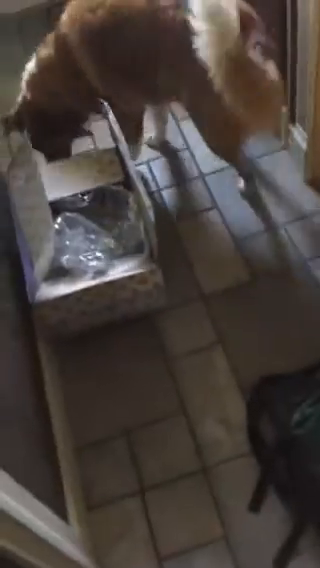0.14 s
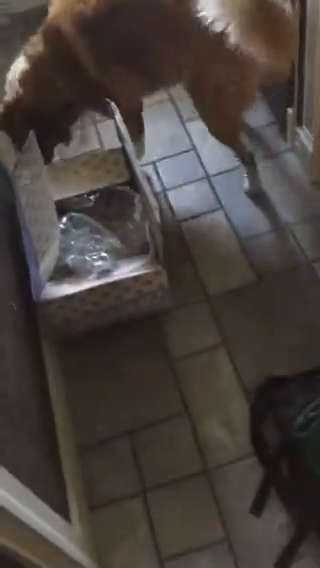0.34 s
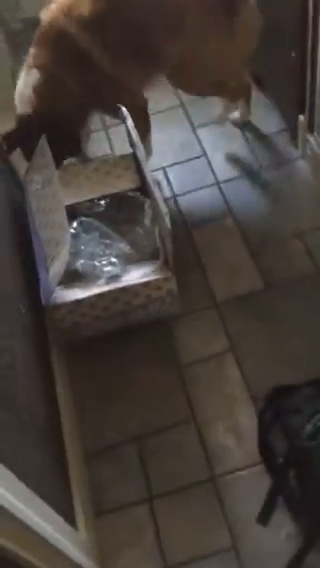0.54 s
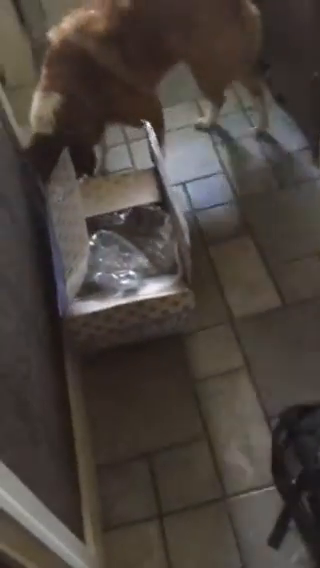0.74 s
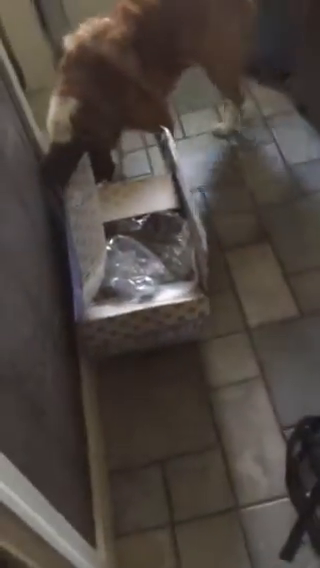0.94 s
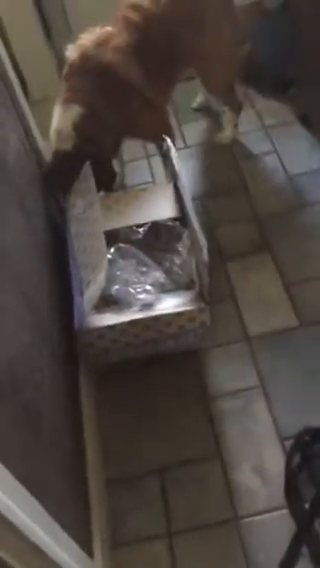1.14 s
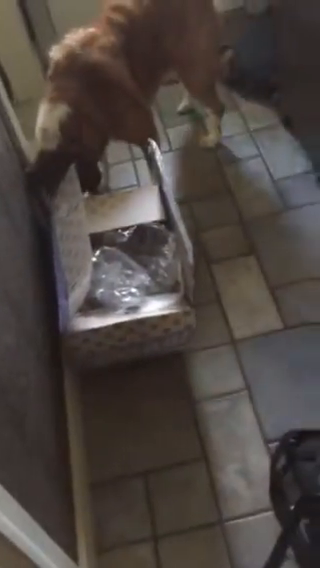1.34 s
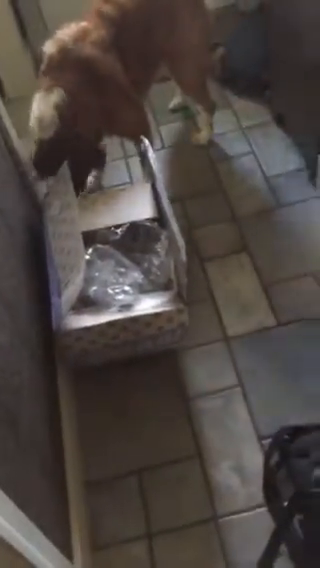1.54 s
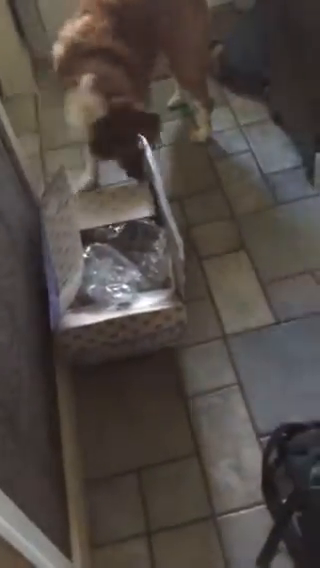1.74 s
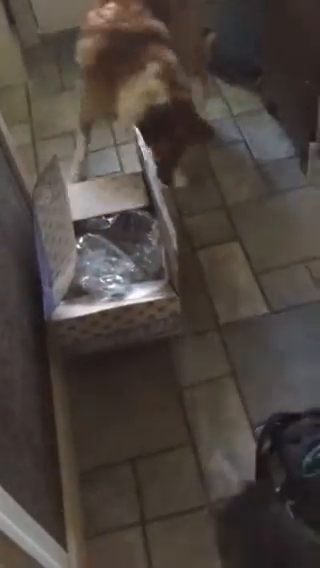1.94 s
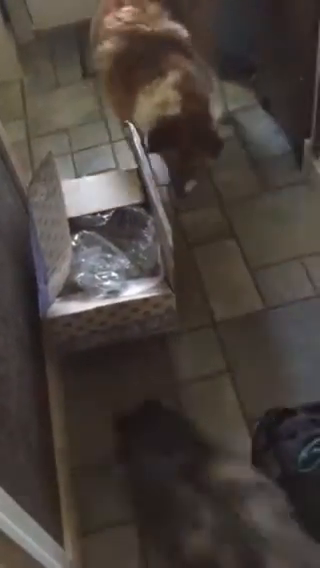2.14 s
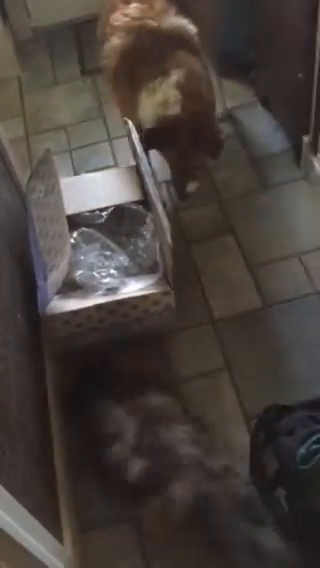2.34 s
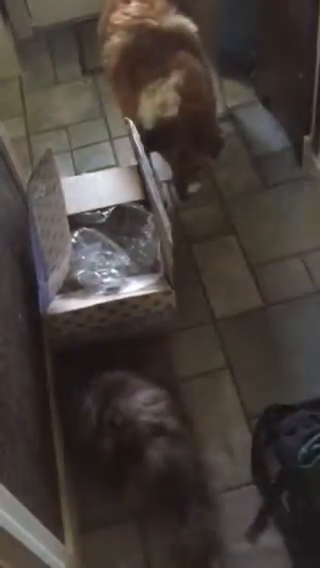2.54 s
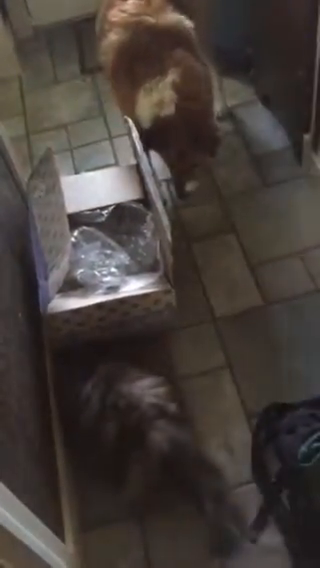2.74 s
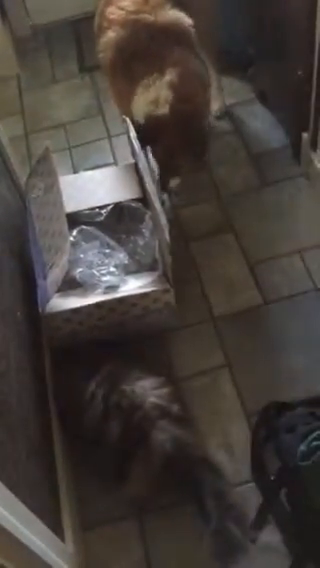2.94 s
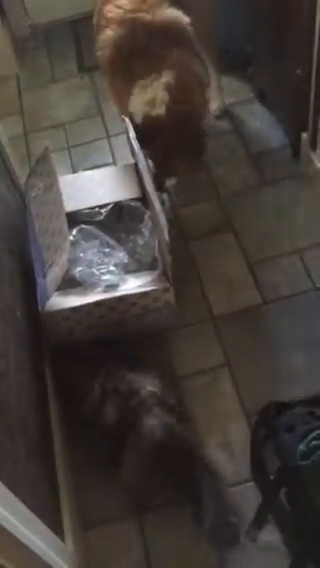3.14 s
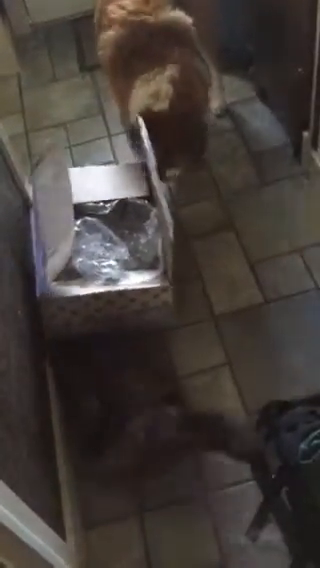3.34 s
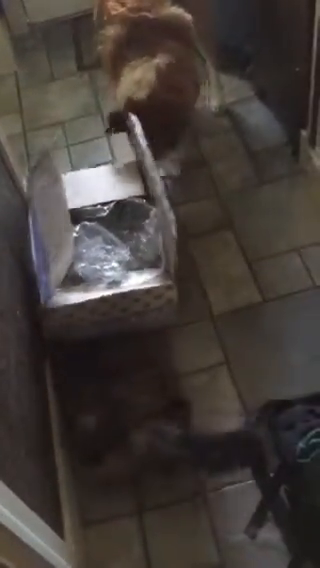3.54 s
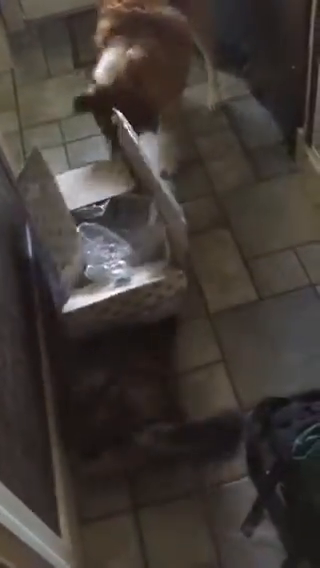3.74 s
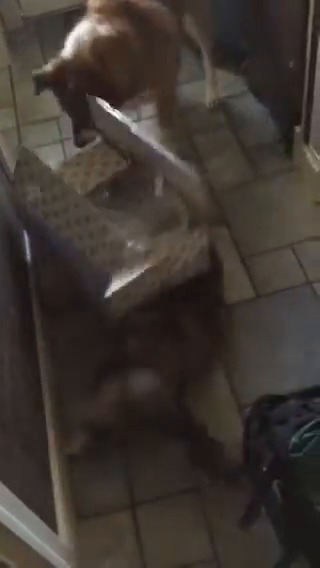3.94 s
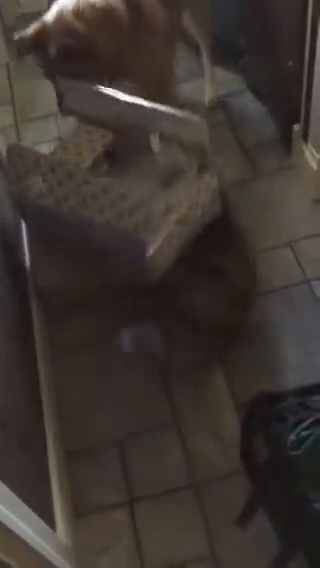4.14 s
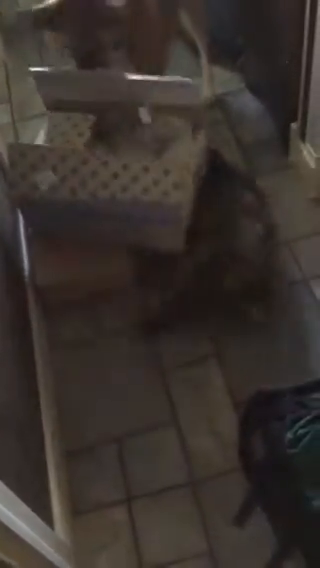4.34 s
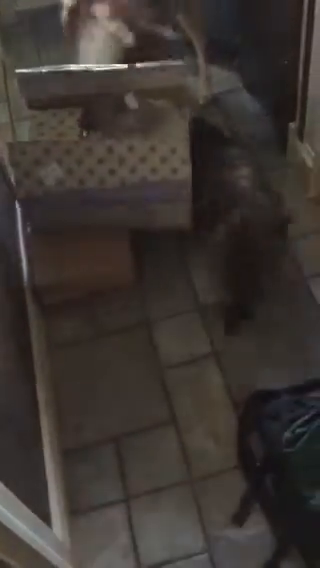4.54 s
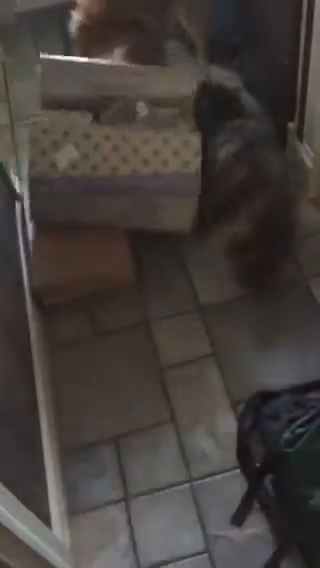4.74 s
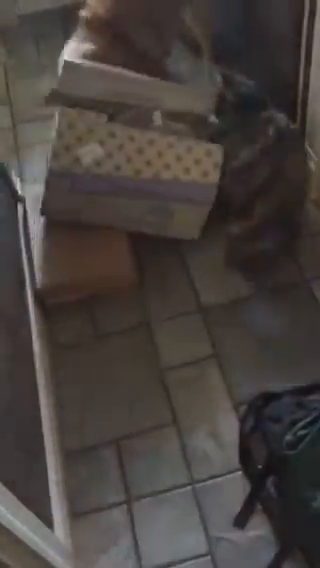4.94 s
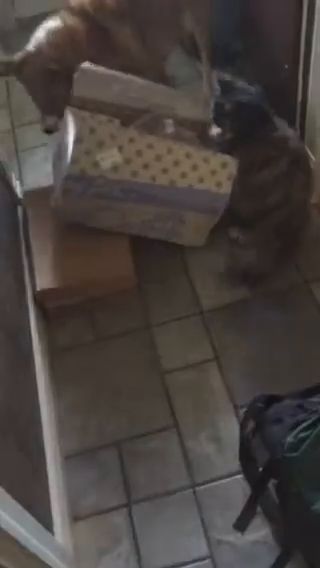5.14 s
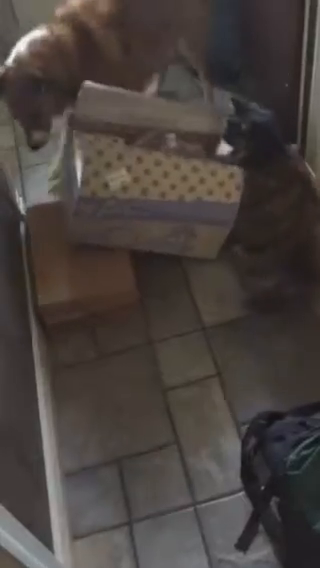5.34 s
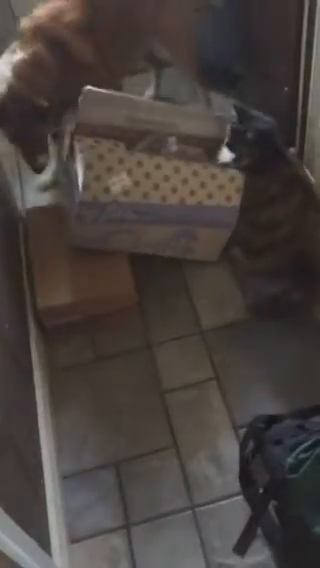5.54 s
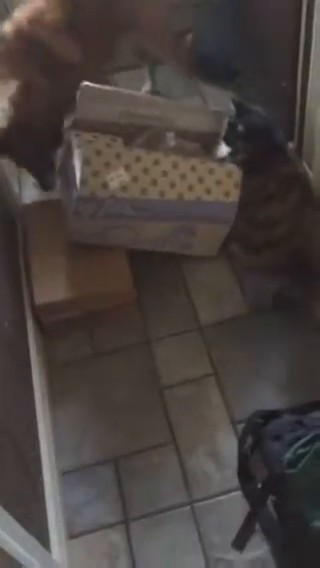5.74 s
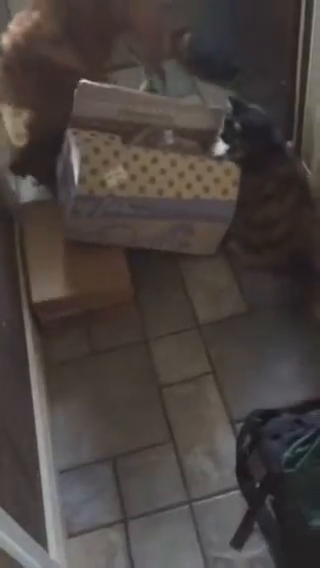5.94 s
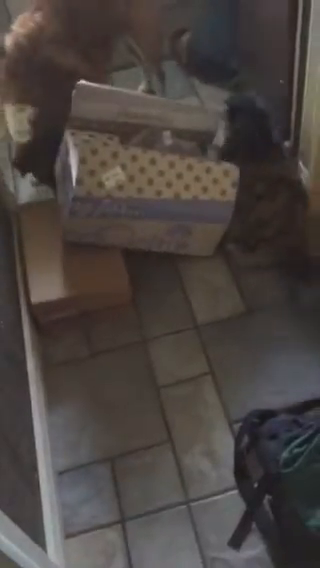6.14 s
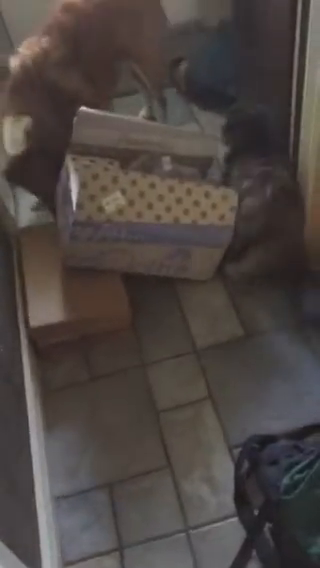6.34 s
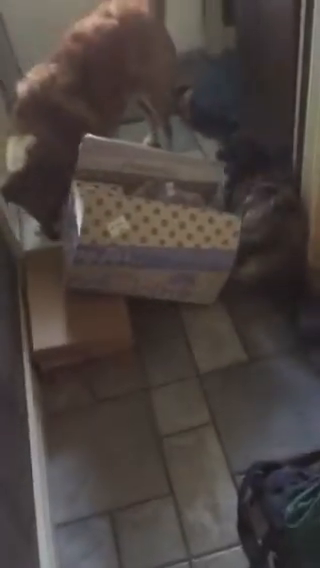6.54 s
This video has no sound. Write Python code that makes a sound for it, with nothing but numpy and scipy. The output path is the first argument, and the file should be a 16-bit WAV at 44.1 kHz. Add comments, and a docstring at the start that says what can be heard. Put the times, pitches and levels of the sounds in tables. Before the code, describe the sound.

Quiet indoor hallway, mono phone sound, with low room air, a faint appliance hum and short reflections from tiles and walls. At 0.1 s a claw tick and soft hollow nose bump on a cardboard box, with a tiny tag clink. Light ticks and a faint bump near 0.8 s, weak taps at 1.2 and 1.4 s. At 1.9 s a crisp tick, then at 2.2 s a firmer damped bump. Near quiet until 3.3 s, when the box is shoved: two quick hollow knocks, a short scrape, more thumps to 3.7 s, faint tags. Softer scuffs and dragging from 3.8 to 4.4 s. A sharp cracking knock at 4.45 s, then the loudest cluster from 4.7 to 5.2 s: deep boxy booms, floor thuds, gritty rasping scrapes. A bright scuff at 5.3 s, a weak knock at 5.4 s, then tiny scuffs, a clink and a tick before quiet until 6.5 s.

```python
"""Claw ticks and a faint tag clink over room air and an appliance hum; a box is then knocked and shoved.
A dog noses a cardboard box over hallway tiles and a cat shoves it from the other side.
Ticks and scuffs are slip bursts with a flap resonance; tags are slip bursts ringing small discs.
The scrape is four corners of filtered slips; knocks are decaying cavity and panel modes plus floor thuds.
Hard walls add a short dense noise tail."""
import sys
import numpy as np
from scipy import signal
from scipy.fft import rfft, irfft
from scipy.io import wavfile
from scipy.ndimage import uniform_filter1d

SR = 44100
rng = np.random.default_rng(int(sys.argv[2]) if len(sys.argv) > 2 else 0)


def generate_wav(sig):
    """Save sig (samples, or channels by samples) to the path in sys.argv[1] as 16-bit PCM at SR."""
    pcm = np.round(np.clip(np.atleast_2d(sig).T, -1, 1) * 32767).astype(np.int16)
    wavfile.write(sys.argv[1], SR, pcm)


N = 291035
T = np.arange(N) / SR
AGE = T[:SR // 2]  # s since a blow


def undb(db):
    """Decibels to amplitude gain."""
    return 10 ** (np.asarray(db) / 20)


def unit(x):
    """Scale to rms 1."""
    return x / np.sqrt(np.mean(x ** 2))


def crest(x, size=256):
    """Scale so that the loudest stretch of size samples has rms 1."""
    return x / np.sqrt(uniform_filter1d(x ** 2, size).max())


def fade(t60_s):
    """Exponential decay after a blow, 60 dB in t60_s."""
    return np.exp(-np.log(1000) * AGE / max(t60_s, 1e-3))


def rise(seconds):
    """A soft contact takes a moment to build its force."""
    return 1 - np.exp(-AGE / max(seconds, 1e-4))


def add(out, start_s, x):
    """Mix x into out from start_s."""
    i = max(int(start_s * SR), 0)
    out[i:i + len(x)] += x[:N - i]


def colour(x, points, tilt_db=0):
    """Minimum-phase filter with the given spectrum, tilted by tilt_db per octave above 1024 Hz."""
    hz, db = np.transpose(points)
    size = 8192
    octave = np.log2(np.maximum(np.fft.rfftfreq(size, 1 / SR), 1))
    gain_db = np.interp(octave, np.log2(hz), db) + tilt_db * np.maximum(octave - 10, 0)
    # fold the cepstrum: the response becomes causal
    cepstrum = irfft(np.log(undb(gain_db)))
    cepstrum[1:size // 2] *= 2
    cepstrum[size // 2 + 1:] = 0
    response = irfft(np.exp(rfft(cepstrum)))
    return signal.fftconvolve(x, response)[:len(x)]


def grains(count, rate_hz, spread_db):
    """Random tiny slips of uneven size, rate_hz per second."""
    size = undb(spread_db * np.minimum(rng.exponential(size=count), 4))
    slips = rng.random(count) < rate_hz / SR
    return slips * size * rng.standard_normal(count)


def wander(rate_hz):
    """Random motion, straight lines between normal draws made rate_hz times a second."""
    knots = rng.standard_normal(400)
    return np.interp(T * rate_hz, np.arange(len(knots)), knots)


def ring(modes, centre_hz=200, octaves=9, scatter_db=2, detune=0.0048, hold=1):
    """Decaying modes; the hit point favours those near centre_hz, a paw or nose shortens them by hold."""
    out = 0
    for mode_hz, level_db, t60_s in modes:
        size, pitch = rng.standard_normal(2)
        favour = 1 / (1 + (np.log2(mode_hz / centre_hz) / octaves) ** 2)
        cycles = mode_hz * (1 + detune * pitch) * AGE + rng.random()
        gain = undb(level_db + scatter_db * size) * favour
        out = out + gain * fade(t60_s * hold) * np.sin(2 * np.pi * cycles)
    return out


def hallway(x, wet_db, t60_s):
    """Direct sound, then dense reflections from tiles and close walls."""
    onset = np.clip(AGE / 0.0044 - .3, 0, 1)
    tail = rng.standard_normal(len(AGE)) * fade(t60_s) * onset
    response = undb(wet_db) * tail / np.linalg.norm(tail)
    response[0] += 1
    return signal.fftconvolve(x, response)[:len(x)]


def crumple(seconds):
    """A burst of tiny slips as a contact gives way; long contacts also start more gently."""
    slips = grains(len(AGE), rate_hz=9000, spread_db=-0.5)
    return slips * np.exp(-AGE / max(seconds, 3e-4)) * rise(0.2 * seconds)


# room air spectrum, relative: (freq_hz, density_db)
AIR_SPECTRUM = [(15, -49), (25, -9.5), (49, -12), (79, -7.5), (112, -4.5), (176, -15), (278, -15.5),
                (394, -21.5), (450, -31), (488, -25), (769, -26), (978, -28), (1180, -27), (4040, -37.5),
                (15000, -47)]
AIR_DB = -61


def room_air():
    """Filtered noise whose level wavers slightly."""
    return unit(colour(rng.standard_normal(N), AIR_SPECTRUM)) * undb(AIR_DB + .5 * wander(1.3))


# appliance hum partials: (freq_hz, mean_level_db as rms)
HUM_PARTIALS = [(119.5, -66), (355.3, -80), (403.7, -84), (1217, -88.5)]


def appliance_hum():
    """Sine partials wavering in level and phase."""
    out = np.zeros(N)
    for freq_hz, level_db in HUM_PARTIALS:
        gain = undb(level_db + 2 * wander(12)) * np.sqrt(2)
        out += gain * np.sin(2 * np.pi * freq_hz * T + 0.53 * wander(7))
    return out


# tags' thin discs, levels relative: (freq_hz, level_db, t60_s)
TAG_MODES = [(6610, -13, .01), (8970, -10, .01), (10380, -11, .014), (10740, -19, .01), (14200, -15, .008)]
# gritty contact spectrum, relative; also the box on tiles: (freq_hz, density_db)
GRIT_SPECTRUM = [(600, 2.5), (1800, -12), (3000, -9), (4800, 0), (6200, 4.5), (7600, -0.5), (10000, -3.5),
                 (15000, -6.5)]
# collar tag clinks: (start_s, level_db)
TAG_CLINKS = [(0.018, -56.5), (2.091, -70), (2.512, -67), (2.582, -70.5), (2.612, -71), (3.484, -58.5),
              (3.604, -59), (5.93, -61)]


def tags():
    """Small metal discs chatter against each other, damped by fur."""
    out = np.zeros(N)
    for start_s, level_db in TAG_CLINKS:
        chatter = crumple(0.0026)
        discs = ring(TAG_MODES, scatter_db=4, detune=.005)
        clink = signal.fftconvolve(chatter, discs)[:len(AGE)]
        rattle = colour(chatter, GRIT_SPECTRUM)
        mix = unit(clink) + undb(-2) * unit(rattle)
        add(out, start_s, undb(level_db) * crest(hallway(mix, wet_db=1.5, t60_s=0.13)))
    return out


# light contact spectrum, relative: (freq_hz, density_db)
TOUCH_SPECTRUM = [(200, -3.5), (700, -6), (1300, 1), (2100, 3), (3200, -3), (5000, -7), (6700, -6.5),
                  (7800, -11), (13000, -17.5), (15500, -31.5)]
FLAP_GAIN = 0.99


def touch(flap_hz, seconds, tilt_db):
    """A contact too light to move the cavity; it wakes one broad flap resonance."""
    contact = colour(crumple(seconds), TOUCH_SPECTRUM, tilt_db)
    flap = signal.lfilter(*signal.iirpeak(flap_hz, 4, fs=SR), contact)
    return crest(hallway(contact + FLAP_GAIN * flap, wet_db=2.0, t60_s=0.17), size=400)


# paws and flaps brush softly: (start_s, level_db, flap_hz)
SCUFFS = [(0.496, -58.5, 3170), (0.826, -55, 3220), (1.774, -62.5, 2660), (2.021, -60.5, 4060),
          (2.053, -59.5, 6140), (3.746, -54.5, 2220), (3.955, -52.5, 1650), (4.085, -59, 5230),
          (4.272, -61, 1810), (5.306, -40.5, 3030), (5.77, -61.5, 2620)]
SCUFF_CRUMPLE_S, SCUFF_HZ, SCUFF_TILT_DB = 0.012, 3230, 0.5


def scuffs():
    """Longer soft contacts; a flap above SCUFF_HZ gives a brighter scuff, a lower one a duller."""
    out = np.zeros(N)
    for start_s, level_db, flap_hz in SCUFFS:
        tilt_db = SCUFF_TILT_DB * np.log2(flap_hz / SCUFF_HZ)
        add(out, start_s, undb(level_db) * touch(flap_hz, SCUFF_CRUMPLE_S, tilt_db))
    return out


# claws and flap edges tick: (start_s, level_db, flap_hz, tilt_db per octave above 1024 Hz)
TICKS = [(0.006, -57, 2820, 3), (0.043, -58.5, 1950, -1), (0.107, -47, 3600, 4), (0.559, -63.5, 6140, 1),
         (0.777, -52, 2520, 2.5), (0.842, -48.5, 2320, 1), (1.16, -56.5, 2210, -0.5),
         (1.372, -55.5, 1660, -7), (1.913, -41, 3930, 2), (2.231, -41, 2020, 2.5), (3.877, -42, 5650, 1.5),
         (4.39, -54, 5600, 9), (4.895, -41.5, 8140, 2.5), (5.17, -41.5, 7200, 21), (5.995, -62, 2880, 3)]
TICK_CRUMPLE_S = 0.0033


def ticks():
    """Short contacts of claws and flap edges, each with its own treble tilt."""
    out = np.zeros(N)
    for start_s, level_db, flap_hz, tilt_db in TICKS:
        add(out, start_s, undb(level_db) * touch(flap_hz, TICK_CRUMPLE_S, tilt_db))
    return out


SHOVE_ATTACK_S, FIRM_SHOVE_DB = 0.014, -51.5  # attack of a firm shove; gentler ones break loose more slowly
SAG_DB_PER_S, RELEASE_DB_PER_S = 29.5, 130  # the box slows, then skids to rest


def shove(start_s, length_s, rasp_db):
    """Speed of one shove: it builds up, sags while the push lasts, then dies away."""
    age = np.maximum(T - start_s, 0)
    attack = np.minimum(age / (SHOVE_ATTACK_S * undb(FIRM_SHOVE_DB - rasp_db)), 1)
    release_db = RELEASE_DB_PER_S * np.maximum(age - length_s, 0)
    return attack * undb(-SAG_DB_PER_S * age - release_db)


def dragging(points, rate_hz, spread_db, count=4):
    """Corners of the box slip together, each in its own spurts, with its own colour and echoes."""
    out = 0
    hz, db = np.transpose(points)
    for corner in range(count):
        spurts = undb(3.5 * wander(50))
        slips = hallway(grains(N, rate_hz, spread_db) * spurts, wet_db=4, t60_s=0.12)
        own_db = 3 * np.cos(2 * np.pi * (np.arange(len(hz)) + corner) / count)
        out = out + unit(colour(slips, np.c_[hz, db + own_db]))
    return unit(out)


# panel rasp spectrum, relative: (freq_hz, density_db)
RASP_SPECTRUM = [(150, -14), (400, -11), (550, -5.5), (900, -0.5), (1250, -6.5), (1800, -5.5), (2600, -8),
                 (4500, -15.5), (9000, -63)]
# air cavity and large walls, levels relative; also ring in boom(): (freq_hz, level_db, free_t60_s)
BOX_MODES = [(143, -13, 0.068), (165.1, 0, 0.24), (201.1, 1, 0.2), (218, 2, 0.057), (248.8, -9, 0.22),
             (277, -10, 0.35), (310.2, -0.5, 0.14), (337, -16, 0.41), (376.8, -2.5, 0.15),
             (422, -8.5, 0.25), (502, -11.5, 0.113), (525, -43, 0.096)]
# floor spectrum, relative; also used by thud(): (freq_hz, density_db)
FLOOR_SPECTRUM = [(20, -30), (40, -3), (55, 16.5), (90, 10), (130, 10), (220, -23), (600, -28.5)]
# the box slides in shoves: (start_s, length_s, rasp_db, grit_db)
SHOVES = [(3.298, 0.14, -53.5, -63), (3.584, 0.3, -58.5, -62.5), (3.792, 0.15, -58, -62.5),
          (3.949, 0.089, -56.5, -56.5), (4.047, 0.15, -63.5, -63), (4.155, 0.17, -63.5, -68),
          (4.367, .07, -57, -61), (4.572, 0.019, -46.5, -51), (4.766, 0.23, -44, -51.5),
          (5.11, 0.15, -50, -52), (5.231, 0.17, -48.5, -49.5), (5.464, 0.055, -60.5, -63)]
DRONE_DB, RUMBLE_DB = -0.5, -4.5  # cavity and floor, re rasp


def scrape():
    """The bottom edge sticks and slips: grit hisses, panels rasp, cavity and floor drone along."""
    rasp_gain = grit_gain = 0
    for start_s, length_s, rasp_db, grit_db in SHOVES:
        speed = shove(start_s, length_s, rasp_db)
        rasp_gain = np.maximum(rasp_gain, undb(rasp_db) * speed)
        grit_gain = np.maximum(grit_gain, undb(grit_db) * speed)
    grit = dragging(GRIT_SPECTRUM, rate_hz=350, spread_db=2.5)
    rasp = dragging(RASP_SPECTRUM, rate_hz=300, spread_db=3.5)
    drone = unit(signal.fftconvolve(rasp, ring(BOX_MODES))[:N])
    rumble = unit(colour(rng.standard_normal(N), FLOOR_SPECTRUM))
    body = rasp + undb(DRONE_DB) * drone + undb(RUMBLE_DB) * rumble
    return grit * grit_gain + body * rasp_gain


def thud(level_db):
    """A dull bump on the floor: filtered, decaying noise."""
    bump = rng.standard_normal(len(AGE)) * rise(0.00083) * fade(0.22)
    return undb(level_db) * crest(colour(bump, FLOOR_SPECTRUM), size=1024)


def boom(level_db, centre_hz, hold, wet_db):
    """The air cavity and large walls of the box answer a blow."""
    modes = ring(BOX_MODES, centre_hz, octaves=0.62, scatter_db=0.9, detune=0.0083, hold=hold)
    return undb(level_db) * crest(hallway(rise(.003) * modes, wet_db, t60_s=0.34), size=1024)


# stiff side panels and flaps, levels relative: (freq_hz, level_db, free_t60_s)
PANEL_MODES = [(603, -1, .12), (690, -3, .08), (770, -2, .1), (882, 2, .14), (960, 0, .1), (1035, 0, .08),
               (1110, -6, .06), (1300, -12, .06), (1420, -9, .08), (1715, -14, .08)]
# edge crack spectrum, relative: (freq_hz, density_db)
CRACK_SPECTRUM = [(150, -16.5), (420, 19), (650, -9), (900, 4), (1900, 3), (2800, -2), (4800, -9.5),
                  (6000, -4.5), (7600, -12.5), (9500, -10), (15000, -26)]
CRACK_DB, FIRM_BLOW_DB = -41.5, -38  # crack of a firm blow; level of that blow
CRACK_GROWTH = 1  # crack dB per blow dB
FIRM_CONTACT_S, SOFTENING_DB = 0.0042, 1.5  # dB per octave of dulling per doubling of contact time


def edge(level_db, contact_s):
    """A crumpling edge rings the panels roughly and cracks; a slow contact cracks duller."""
    modes = ring(PANEL_MODES, scatter_db=2, detune=0.014, hold=0.35)
    panel = signal.fftconvolve(crumple(.5 * contact_s), modes)[:len(AGE)]
    panel = hallway(panel, wet_db=0, t60_s=.23)
    tilt_db = -SOFTENING_DB * np.log2(contact_s / FIRM_CONTACT_S)
    crack = hallway(colour(crumple(contact_s), CRACK_SPECTRUM, tilt_db), wet_db=-1.5, t60_s=0.17)
    crack_db = CRACK_DB + CRACK_GROWTH * (level_db - FIRM_BLOW_DB)
    return undb(level_db) * crest(panel, size=400) + undb(crack_db) * crest(crack, size=400)


# the box's weight comes down on the floor: (start_s, thud_db)
DROPS = [(4.207, -49), (4.577, -45.5), (4.764, -37.5), (4.864, -49), (5.118, -39)]


def drops():
    """Floor thuds alone."""
    out = np.zeros(N)
    for start_s, thud_db in DROPS:
        add(out, start_s, thud(thud_db))
    return out


# the dog's nose bumps the box: (start_s, boom_db, centre_hz)
NUDGES = [(0.107, -41.5, 213), (0.78, -54.5, 270), (1.914, -52.5, 213), (2.075, -56.5, 150),
          (2.232, -37, 190), (2.325, -49.5, 208)]
NUDGE_HOLD, NUDGE_THUD_DB, NUDGE_WET_DB = 0.37, -10.5, -8.5  # share of free t60; thud re boom; tail re direct


def nudges():
    """A nose stays on the box and damps it: a short boom and a floor thud."""
    out = np.zeros(N)
    for start_s, boom_db, centre_hz in NUDGES:
        body = boom(boom_db, centre_hz, NUDGE_HOLD, NUDGE_WET_DB)
        add(out, start_s, body + thud(boom_db + NUDGE_THUD_DB))
    return out


# the box is knocked: (start_s, boom_db, centre_hz, edge_db, contact_s)
KNOCKS = [(3.327, -35, 398, -37, 0.0072), (3.367, -30, 235, -45.5, 0.0067), (3.474, -39.5, 214, -62, 0.017),
          (3.672, -40, 187, -56, 0.0097), (4, -53.5, 224, -49, 0.0047), (4.335, -53, 159, -72, 0.0063),
          (4.454, -32.5, 217, -30.5, 0.0026), (4.577, -46, 256, -62, 0.0098), (4.711, -41, 326, -52, 0.018),
          (4.757, -33.5, 313, -33, 0.0055), (4.78, -33.5, 298, -43, 0.004),
          (4.864, -28.5, 260, -40.5, .0035), (4.956, -35, 217, -46, .01), (5.116, -30, 156, -64, 0.0054),
          (5.168, -28.5, 192, -38, 0.0045), (5.425, -53, 219, -59, 0.0056)]
KNOCK_HOLD, KNOCK_THUD_DB, KNOCK_WET_DB = 0.89, -15.5, -5  # share of free t60; thud re boom; tail re direct


def knocks():
    """A blow on the edge: the box rings almost freely, the edge cracks, the floor thuds."""
    out = np.zeros(N)
    for start_s, boom_db, centre_hz, edge_db, contact_s in KNOCKS:
        body = boom(boom_db, centre_hz, KNOCK_HOLD, KNOCK_WET_DB)
        add(out, start_s, body + thud(boom_db + KNOCK_THUD_DB) + edge(edge_db, contact_s))
    return out


def scene():
    """Everything in the hallway, on one channel."""
    blows = nudges() + knocks() + drops()
    light = ticks() + scuffs() + tags()
    sliding = scrape()
    background = room_air() + appliance_hum()
    return (blows + light + sliding + background)[None]


TOP_HZ = 15450


def record(dry):
    """The phone drops the deepest rumble and cuts the top."""
    dry = signal.sosfilt(signal.butter(4, 34, "high", fs=SR, output="sos"), dry)
    return signal.sosfilt(signal.ellip(10, .2, 70, TOP_HZ, fs=SR, output="sos"), dry)


dry = scene()
out = record(dry)
generate_wav(out)
```